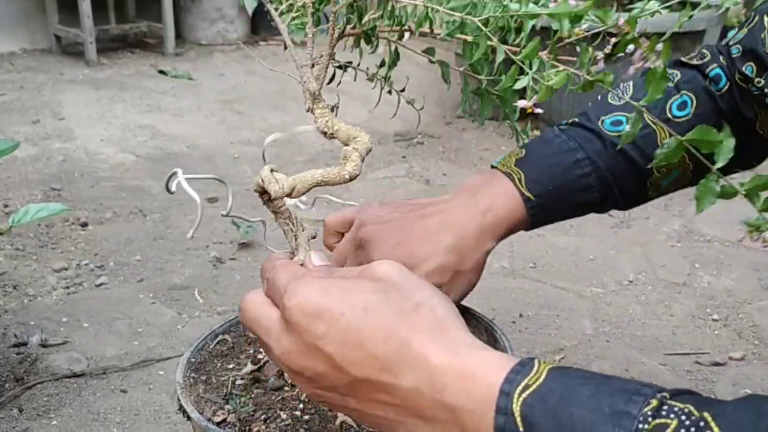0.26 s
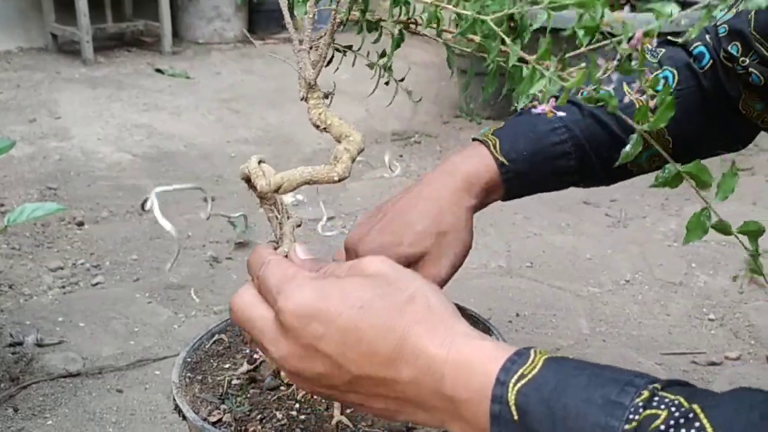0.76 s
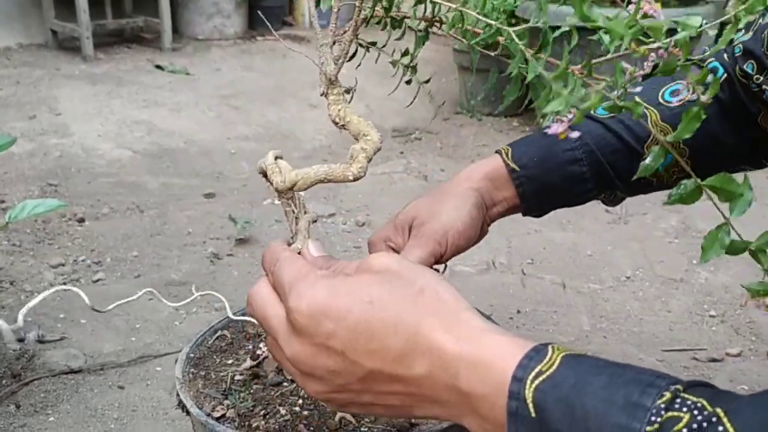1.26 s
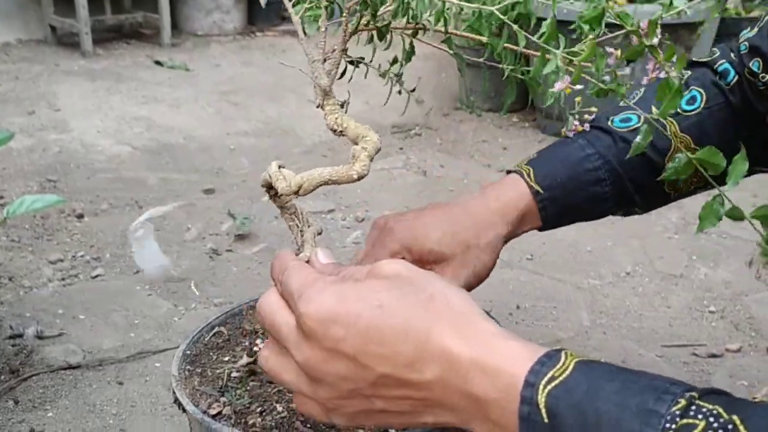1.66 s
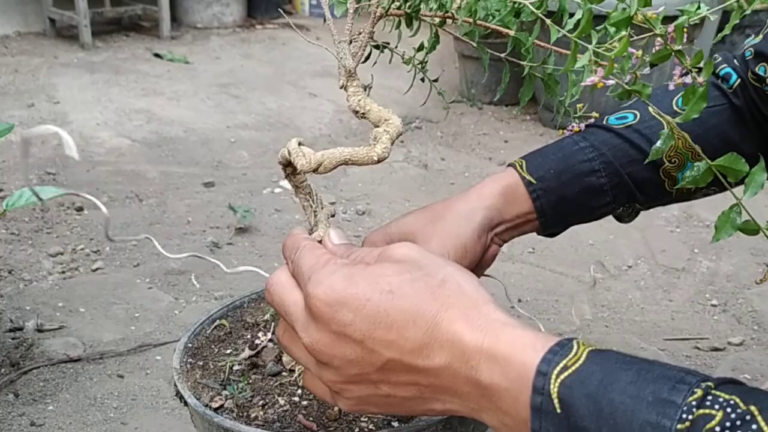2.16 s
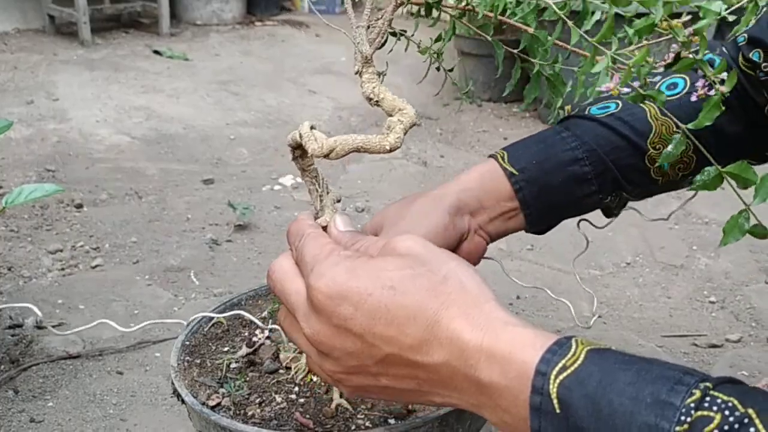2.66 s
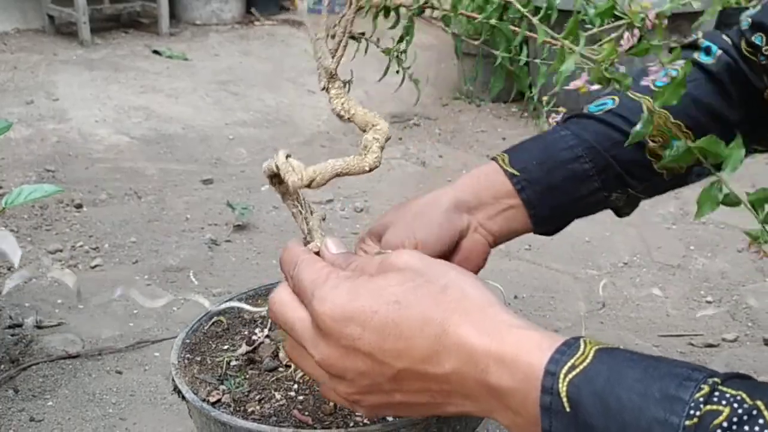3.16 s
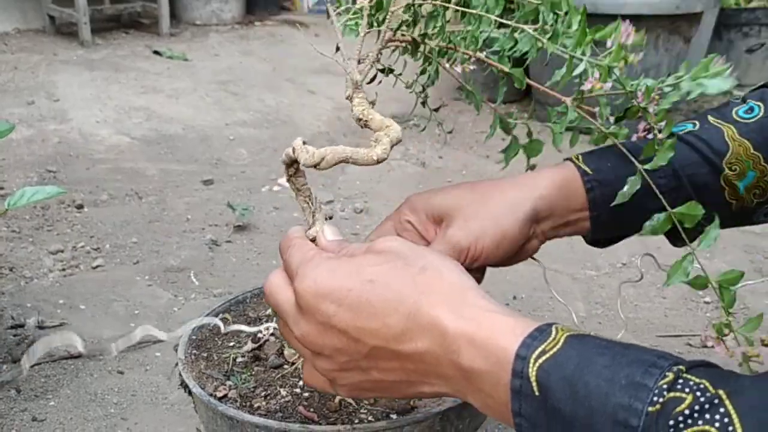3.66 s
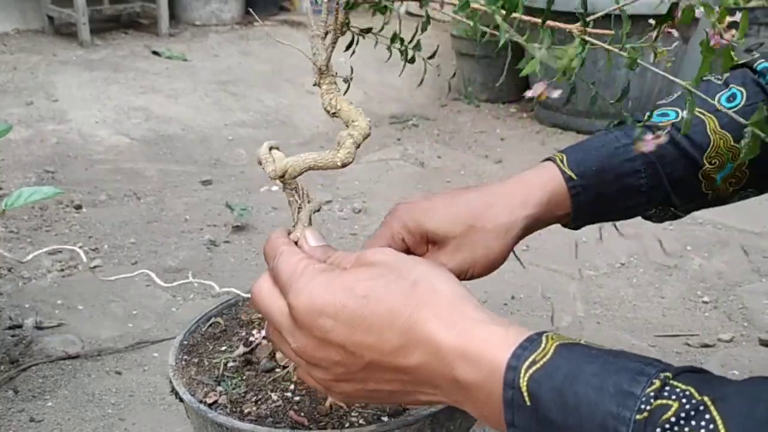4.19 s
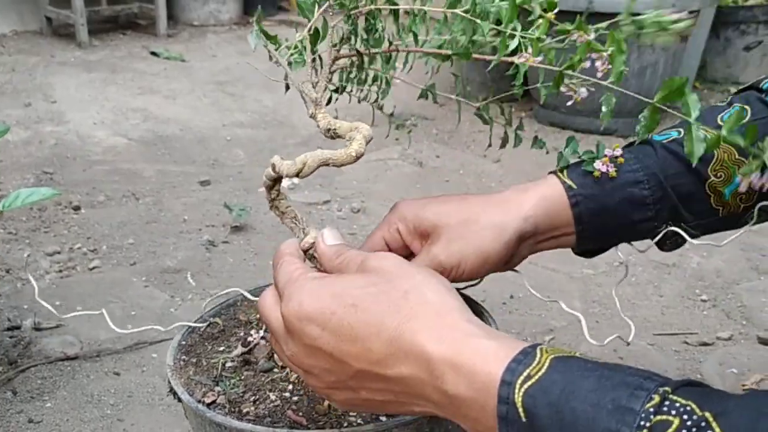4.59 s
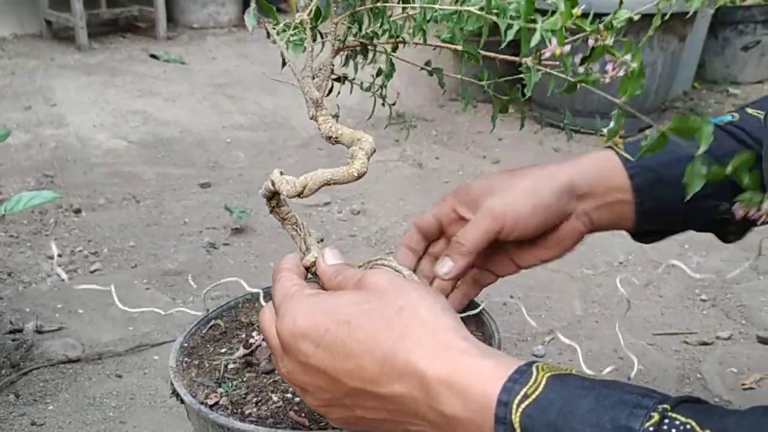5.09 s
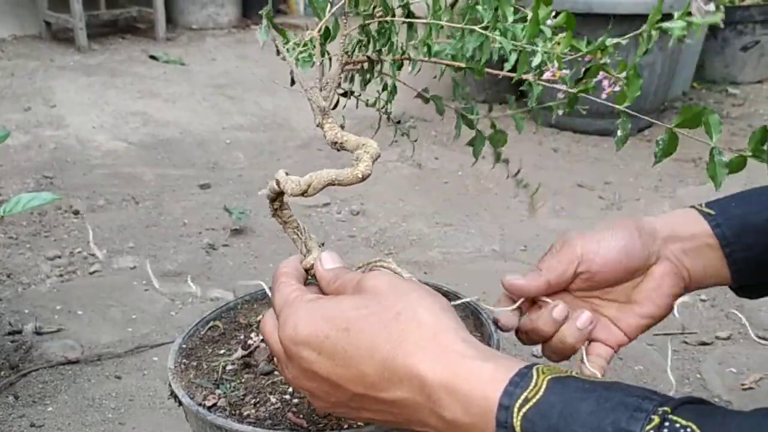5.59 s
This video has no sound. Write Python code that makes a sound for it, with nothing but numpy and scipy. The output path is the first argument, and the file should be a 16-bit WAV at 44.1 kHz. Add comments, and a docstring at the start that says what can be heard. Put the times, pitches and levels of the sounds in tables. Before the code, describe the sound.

Outdoors in a walled yard, a low distant engine hum and soft rumble run throughout, with a very faint leafy hiss. At 0.3 s a far bird gives one thin high note. At 1.05 s a nearer songbird, on the right, utters a shrill, husky-edged call lasting about 0.2 s that leaps up and warbles. At 1.6 and 1.9 s it whistles two swelling upward slurs, then from 2.3 to 3.9 s alternates breathy falling notes with clearer, louder high ones, about six a second, ending on two falling notes. Short diffuse echoes follow each note. Tiny dry ticks of wire on bark appear at 2.1 and 3.2 s, with a little leaf rustle around 3.3 s. After the song, ticks cluster at 4.1-4.3 s, with others at 4.7 and 5.2-5.5 s. The engine swells, strongest near 5.5 s, as leaves rustle and wire scrapes faintly, grainily at 5.3-5.6 s.

```python
"""A walled yard, with a songbird off to one side of the microphone. It gives one shrill two-voiced call,
then whistles a phrase: two rising slurs and a run of alternating falling and high notes. Its notes are
gliding sines with overtones and breath, echoed by the yard. Far off, another bird gives one thin note.
Hands wind wire round a potted shrub: filtered noise makes the ticks, a scrape and the leaf rustle.
In the distance an engine hums, a sum of slow-wavering sines, over a low noise rumble."""
import sys
import numpy as np
from scipy import signal
from scipy.fft import rfft, irfft, next_fast_len
from scipy.io import wavfile
from scipy.ndimage import uniform_filter1d, map_coordinates

SR = 44100
rng = np.random.default_rng(int(sys.argv[2]) if len(sys.argv) > 2 else 0)


def transcribe(u):
    """Save the signal u as a 16-bit wav file named by the first command-line argument.

    u: samples, shape (n,) or (channels, n), limited to [-1, 1]; the rate is SR.
    q: integer samples, one column per channel.
    """
    v = np.clip(np.atleast_2d(u).T, -1, 1)
    q = np.round(v * 32767).astype(np.int16)
    wavfile.write(sys.argv[1], SR, q)


N = 257544
TOP_HZ = 15850  # band limit of the microphone

SHRILL_AT_S, UNDER_AT_S = 1.053, 1.063  # starts of the call's upper and lower voices
# Note levels are those at the bird, before foliage and yard.
# Rising slurs that open the phrase: (t/s, length/s, from f/Hz, to f/Hz, peak level/dB)
RISING_NOTES = [(1.597, .19, 1402, 1920, -23), (1.915, 0.1426, 1958, 2083, -17.5)]
# Falling notes, f before the steady sag and level before the fade:
# (t/s, length/s, from f/Hz, to f/Hz, middle of the drop after t/s, glide t/s, level/dB)
FALLING_NOTES = [(2.298, 0.16, 2181, 1565, .06, .019, -21.5), (2.672, 0.09, 1888, 1450, 0.047, .01, -21.5),
                 (2.975, .095, 1810, 1320, 0.051, 0.0091, -22.5),
                 (3.288, 0.097, 1910, 1446, 0.052, 0.011, -20.5), (3.606, 0.11, 1812, 1256, .055, .01, -23),
                 (3.776, 0.16, 1734, 1342, 0.041, 0.008, -23.5)]
# High notes between them, f before the sag: (t/s, length/s, f/Hz, scooped from below by f/Hz, peak level/dB)
HIGH_NOTES = [(2.527, .113, 2333, 300, -17), (2.815, 0.12, 2294, 20, -16), (3.115, .105, 2286, 72, -16.5),
              (3.436, 0.12, 2347, 8.1, -18.5)]


def bird():
    """Both sides of the syrinx sound in the shrill call; one alone whistles the phrase."""
    voice = np.zeros(N)
    add(voice, SHRILL_AT_S, shrill_upper())
    add(voice, UNDER_AT_S, shrill_lower())
    for table, sing in (RISING_NOTES, rising_note), (FALLING_NOTES, falling_note), (HIGH_NOTES, high_note):
        for s, *shape in table:
            add(voice, s, sing(*shape))
    return voice


SHRILL_LENGTH_S = 0.219
SHRILL_LOW_HZ, SHRILL_HIGH_HZ = 4577, 5028
SHRILL_LOW_DB, SHRILL_HIGH_DB = -19, -12
LEAP_AFTER_S, LEAP_GLIDE_S, CLIMB_HZ_PER_S = 0.043, 0.0083, 1350
WARBLE_HZ, WARBLE_DEPTH_HZ = 16.5, 60


def shrill_upper(sag_db_per_s=6, warble_db=0.9):
    """The loud side of the call: husky and low, then a leap to a climbing whistle warbling in pitch and strength."""
    t = clock(SHRILL_LENGTH_S)
    leap = step(t, LEAP_AFTER_S, LEAP_GLIDE_S)
    warble = np.cos(2 * np.pi * WARBLE_HZ * t)
    high_hz = SHRILL_HIGH_HZ + CLIMB_HZ_PER_S * t + WARBLE_DEPTH_HZ * warble
    high_db = SHRILL_HIGH_DB + warble_db * warble - sag_db_per_s * t
    hz = SHRILL_LOW_HZ + leap * (high_hz - SHRILL_LOW_HZ) - droop(t, depth_hz=480, last=0.0064)
    db = SHRILL_LOW_DB + leap * (high_db - SHRILL_LOW_DB) + gate(t, attack=0.014, release=0.02)
    return note(hz, db, jitter=0.0057, overtone_db=-19.5, rasp=0.3, air_db=-39.5, husky_db=26.5)


UNDER_LENGTH_S, UNDER_GLIDE_S, UNDER_DB = 0.048, 0.018, -26.5
UNDER_FROM_HZ, UNDER_TO_HZ = 3820, 4460


def shrill_lower():
    """The second voice joins briefly under the first: a short rough upward glide."""
    t = clock(UNDER_LENGTH_S)
    hz = UNDER_TO_HZ + (UNDER_FROM_HZ - UNDER_TO_HZ) * np.exp(-t / UNDER_GLIDE_S)
    db = UNDER_DB + gate(t, attack=0.004, release=0.018)
    return note(hz, db, jitter=0.008, overtone_db=12.5, rasp=0.3, air_db=-24.0, husky_db=1)


RISE_BEND = 1.3  # above 1 the pitch levels off
RISE_PEAK_SHARE, RISE_SWELL_DB, RISE_FADE_DB = 0.815, 26, 6  # the note is loudest late


def rising_note(length, from_hz, to_hz, db):
    """A slur that swells as it climbs and levels off."""
    t = clock(length)
    hz = to_hz + (from_hz - to_hz) * (1 - t / length) ** RISE_BEND
    swell = np.interp(t / length, [0, RISE_PEAK_SHARE, 1], [-RISE_SWELL_DB, 0, -RISE_FADE_DB])
    level_db = db + swell + gate(t, attack=0.022, release=0.016)
    return note(hz, level_db, jitter=0.0089, overtone_db=2.5, rasp=0.12, air_db=-23.5, husky_db=3.5)


def falling_note(length, from_hz, to_hz, middle, glide, db, sag_db_per_s=40, sag_hz_per_s=850):
    """A note that slides down between two pitches, sagging all the while and growing huskier and weaker."""
    t = clock(length)
    hz = from_hz + (to_hz - from_hz) * step(t, middle, glide) - sag_hz_per_s * t
    level_db = db - sag_db_per_s * t + gate(t, attack=0.023, release=0.019)
    return note(hz, level_db, jitter=0.008, overtone_db=-6.0, rasp=0.056, air_db=-19.0, husky_db=6)


SCOOP_S = 0.022  # how quickly a scooped note reaches its pitch
HIGH_SAG_HZ_PER_S = 650
HIGH_PEAK_SHARE, HIGH_SWELL_DB, HIGH_FADE_DB = 0.46, 4, 10.5


def high_note(length, pitch_hz, scoop_hz, db):
    """A clear whistle that scoops up to its pitch, sags slowly and droops at the end."""
    t = clock(length)
    scooped_hz = pitch_hz - scoop_hz * np.exp(-t / SCOOP_S)
    hz = scooped_hz - HIGH_SAG_HZ_PER_S * t - droop(t, depth_hz=150, last=0.011)
    swell = np.interp(t / length, [0, HIGH_PEAK_SHARE, 1], [-HIGH_SWELL_DB, 0, -HIGH_FADE_DB])
    level_db = db + swell + gate(t, attack=0.019, release=0.0038)
    return note(hz, level_db, jitter=0.0048, overtone_db=-2, rasp=0.033, air_db=-19.5, husky_db=2.2)


# Overtones as shaped by throat and beak, before each note's own offset: (f/Hz, level/dB)
OVERTONE_SHAPE = [(2400, -21.5), (3000, -22), (3700, -34.5), (4500, -31), (5300, -34.5), (6600, -35),
                  (8200, -40.5), (9800, -25.5), (11300, -26.5), (12400, -42), (14000, -53.5),
                  (15500, -43.5)]
# The voice is husky at the low end of each of its two registers: (pitch f/Hz, roughness/0-1)
HUSKINESS = [(1200, 0.97), (1700, 0.82), (2100, 0.15), (2400, 0.37), (4000, 0.3), (4600, 1), (5100, 0.06)]
# Colour of the air rushing through the syrinx: (f/Hz, relative level/dB per Hz)
BREATH_COLOUR = [(1800, -18.5), (2500, -1.5), (4000, -8), (5400, 8), (8000, -3.5), (10400, 9.5),
                 (12000, -39), (14500, -9.5), (16000, -30)]


def note(hz, db, jitter, overtone_db, rasp, air_db, husky_db):
    """One slur of the syrinx: a gliding sine with overtones, roughened by the air that drives it."""
    size = len(hz)
    pitch = hz * (1 + jitter * wobble(163.1, size))
    husk = along(HUSKINESS, pitch)
    phase = 2 * np.pi * np.cumsum(pitch) / SR + rasp * husk * wobble(1300, size)
    level = amp(db + 2.73 * wobble(100.8, size))
    tone = np.sin(phase)
    for k in range(2, 10):
        # husky notes have stronger, less steady overtones
        gain_db = along(OVERTONE_SHAPE, k * pitch) + overtone_db + husky_db * husk
        gain = amp(gain_db) * (k * pitch < TOP_HZ)
        tone += gain * np.sin(k * phase + 0.5 * husk * wobble(700, size))
    grid = np.fft.rfftfreq(size, 1 / SR)
    air = irfft(rfft(rng.standard_normal(size)) * amp(along(BREATH_COLOUR, grid)), size)
    return level * (np.sqrt(2) * tone + amp(air_db) * husk ** 2 * unit(air))


# The clearest wire and twig ticks, levels before a common lift:
# (t/s, peak level/dB, centre f/Hz, left-right level/dB)
CLEAR_TICKS = [(2.1151, -38, 4000, -21), (3.235, -29.5, 6900, -2.5), (4.1478, -44, 3400, -22),
               (4.2271, -44.5, 3000, -19), (4.25, -39.5, 3460, -28), (4.2822, -39.5, 2960, -30),
               (4.3177, -33, 7930, 4), (4.682, -39, 3970, -24.5), (5.1856, -40.5, 4400, -7),
               (5.2086, -42, 2980, -32), (5.2882, -40, 2670, -21), (5.4954, -33, 2830, -11)]
TICK_LIFT_DB = 4.5


def ticks(t60=0.022, octaves=0.84, dull_hz=10500):
    """Wire slips on bark: short dry snaps of decaying noise, each around its own pitch."""
    out = np.zeros((2, N))
    t = np.arange(2048) / SR
    grid = np.fft.rfftfreq(len(t), 1 / SR)
    for s, db, hz, lean_db in CLEAR_TICKS + faint_ticks():
        band = np.exp(-0.5 * (np.log2((grid + 1) / hz) / octaves) ** 2)
        colour = band / (1 + (grid / dull_hz) ** 10)
        # noise common to both sides, plus some of each side's own
        noise = rng.standard_normal(len(t)) + 0.5 * rng.standard_normal((2, len(t)))
        snap = irfft(rfft(noise) * colour) * amp(-60 * t / t60)
        add(out, s, amp(db + TICK_LIFT_DB) * sides(lean_db)[:, None] * snap / np.abs(snap).max())
    return out


WINDING_FROM_S, WINDING_TO_S = 2.5, 5.6
FAINT_TICK_DB, FAINT_TICK_HZ, FAINT_LEAN_DB = -43, 4120, 1  # level before the lift


def faint_ticks(count=6, spread_db=4, spread_octaves=0.515):
    """Fainter ticks come at random while the wire is wound tight; rows as in the table of clear ticks."""
    rows = []
    for when, strength, height in rng.random((count, 3)):
        s = WINDING_FROM_S + when * (WINDING_TO_S - WINDING_FROM_S)
        db = FAINT_TICK_DB + spread_db * (2 * strength - 1)
        hz = FAINT_TICK_HZ * 2 ** (spread_octaves * (2 * height - 1))
        rows.append((s, db, hz, FAINT_LEAN_DB))
    return rows


# Strokes of wire drawn over the pot's rim: (t/s, half width t/s, peak level/dB)
WIRE_STROKES = [(5.29, .015, -48.5), (5.42, 0.034, -49), (5.57, 0.05, -54)]
# Colour of the scrape: (f/Hz, relative level/dB per Hz)
SCRAPE_COLOUR = [(600, -9), (1400, 5), (2200, 4), (3200, -6), (6000, -3), (10000, -34), (15000, -44)]


def wire(slip_rate=350):
    """The loose wire catches and slips as it is drawn out: random impulses make a short grainy scrape."""
    strength = rng.uniform(-0.91, 1, N) + 0.48 * rng.uniform(-1, 1, (2, N))
    slips = (rng.random(N) < slip_rate / SR) * strength
    grains = unit(filtered(slips, lambda hz: amp(along(SCRAPE_COLOUR, hz))))
    return swells(WIRE_STROKES) * grains * sides(-28.5)[:, None]


# Leaves and sleeves stirred by the hands, before flutter and crackle:
# (t/s, half width t/s, peak level/dB)
STIR_STROKES = [(3.24, .035, -51), (3.33, 0.11, -53), (5.3, 0.57, -53), (5.44, 0.1, -52.5)]
# Colour of the leaves: (f/Hz, relative level/dB per Hz)
LEAF_COLOUR = [(350, -22.5), (700, -5), (1300, -5), (2600, -4.5), (3600, -7.5), (8600, -9), (10200, -19.5),
               (13000, -23.5), (16000, -34)]
RUSTLE_DB = -56.5  # steady rustle under the strokes


def shrub(crackle_rate=14, crackle_db=13):
    """The soft rustle of the shrub: patchy noise that flutters in level, flecked with tiny crackles."""
    specks = (rng.random(N) < crackle_rate / SR) * rng.standard_normal((2, N))
    crackle = amp(crackle_db) * filtered(specks, lambda hz: amp(along(LEAF_COLOUR, hz)))
    stir = np.hypot(amp(RUSTLE_DB), swells(STIR_STROKES)) * amp(0.58 * wobble(45))
    return stir * (rush(LEAF_COLOUR, patchy_db=1.67) + 2 * crackle)


FAR_AT_S, FAR_LENGTH_S = 0.33, 0.195
FAR_HZ, FAR_SCOOP_HZ, FAR_DB = 3850, 71, -57.5  # level before the mix with its echo


def far_bird(sag_db_per_s=50):
    """The distant bird's one note: a thin whistle that scoops up to its pitch and weakens."""
    voice, t = np.zeros(N), clock(FAR_LENGTH_S)
    hz = FAR_HZ - FAR_SCOOP_HZ * np.exp(-t / SCOOP_S)
    db = FAR_DB - sag_db_per_s * t + gate(t, attack=0.0019, release=0.02)
    add(voice, FAR_AT_S, note(hz, db, jitter=0.011, overtone_db=-24, rasp=0.3, air_db=-26.5, husky_db=2.5))
    return voice


# The engine slows a little as it comes nearer: (t/s, mean cycle rate f/Hz, level/dB)
ENGINE_COURSE = [(0, 28.93, -54.5), (3.9, 28.42, -56), (4.4, 28.53, -50.5), (5.5, 28.05, -44.5),
                 (5.84, 27.67, -48.5)]
# Engine orders: (multiple of the cycle rate, relative level/dB)
ENGINE_ORDERS = [(2, -4), (3, -15.5), (4, -5), (6, -2), (8, -1.5), (10, -17.5), (12, -16.5)]
# A second hum: (f/Hz, level/dB before its fade)
SECOND_HUM = [(86.1, -61), (177.6, -58), (209.9, -57), (290.7, -64.5)]
# Fade of that second hum: (t/s, level/dB)
SECOND_HUM_FADE = [(0, -2), (.7, -4), (1.3, -5.5), (3, -6.5)]


def engine():
    """Low orders of a distant engine, each wavering on its way, and a second hum that fades a little."""
    rate, db = curves(ENGINE_COURSE)
    phase = 2 * np.pi * np.cumsum(rate * (1 + 0.0017 * wobble(4.2))) / SR
    hum = np.zeros(N)
    for k, level in ENGINE_ORDERS:
        hum += amp(level + 3.7 * wobble(4.5)) * np.sin(k * phase + 0.28 * wobble(1.7))
    t = np.arange(N) / SR
    drone = np.zeros(N)
    for hz, level in SECOND_HUM:
        drone += amp(level + 4.1 * wobble(11.0)) * np.sin(2 * np.pi * hz * t + wobble(4.5))
    return amp(db) * unit(hum) + amp(curves(SECOND_HUM_FADE)[0]) * drone


# Colour of the neighbourhood's rumble: (f/Hz, relative level/dB per Hz)
RUMBLE_COLOUR = [(12, -46), (24, 7), (40, -7), (70, -6.5), (130, -9), (165, -1.5), (205, -9.5), (260, -11),
                 (370, -15), (540, -12.5), (720, -24), (1200, -28), (2600, -120)]
RUMBLE_DB, RUMBLE_FOLLOWS = -52, 0.2  # mean level; share of the engine's swell in dB that it takes


def neighbourhood():
    """Low noise rumble that partly follows the engine's swell."""
    engine_db = curves(ENGINE_COURSE)[1]
    level_db = RUMBLE_DB + RUMBLE_FOLLOWS * (engine_db - engine_db.mean())
    return amp(level_db) * rush(RUMBLE_COLOUR, patchy_db=1.78)


# Decay of the yard's tail: (f/Hz, t60/s)
YARD_DECAY = [(500, 0.25), (1600, 0.48), (2300, 0.53), (5000, 0.36), (12000, 0.23)]
# Strength of the yard's echo: (f/Hz, level/dB)
ECHO_LEVEL = [(1200, -8.5), (1700, 2.5), (2050, 0), (2280, -1), (2650, 6.5), (3500, -1.5), (4400, -7.5),
              (5200, -11), (7000, 6.5), (12000, -3)]


def yard(x, gap=0.0031, early_db=5, early_t60=0.19):
    """Near walls and pots answer densely at once; then a tail, each frequency dying at its own speed."""
    noise = rng.standard_normal((2, SR * 3 // 4))
    hz, t, z = signal.stft(noise, SR, nperseg=256)
    late = amp(-60 * t / along(YARD_DECAY, hz)[:, None])
    early = amp(early_db - 60 * t / early_t60)
    shape = (late + early) * np.minimum(t / gap / 2, 1)
    energy = np.sum(shape ** 2, axis=1, keepdims=True) * t[1] * SR
    shape *= amp(along(ECHO_LEVEL, hz))[:, None] / np.sqrt(energy)
    tail = signal.istft(z * shape, SR, nperseg=256)[1]
    return signal.fftconvolve(x[None], tail, axes=1)[:, :N]


# Likeness of the two sides in background noise: (f/Hz, left-right correlation)
SIDE_LIKENESS = [(60, 0.85), (150, 0.91), (380, 0.84), (950, 0.35), (2380, -0.0), (5980, 0.0033),
                 (15000, -0.0)]


def rush(spectrum, patchy_db):
    """Stereo noise of rms 1 with patches of random gain in time and frequency."""
    z = signal.stft(rng.standard_normal((2, N)), nperseg=512)[2]
    field = rng.standard_normal(z.shape[1:])
    field = uniform_filter1d(uniform_filter1d(field, 16, 0), 8, 1)
    pair = signal.istft(z * amp(patchy_db * unit(field)), nperseg=512)[1][:, :N]

    def mid_side(hz):
        turn = np.arccos(np.clip(along(SIDE_LIKENESS, hz), -1, 1)) / 2
        return amp(along(spectrum, hz)) * [np.cos(turn), np.sin(turn)]

    mid, side = filtered(pair, mid_side)
    return unit(np.array([mid + side, mid - side]))


def clock(length):
    """Time since the start of a note."""
    return np.arange(round(length * SR)) / SR


def step(t, middle, glide):
    """A smooth passage from 0 to 1 around the middle."""
    return 0.5 + 0.5 * np.tanh((t - middle) / (2 * glide))


def gate(t, attack, release):
    """Level in dB of a note that opens, holds and closes."""
    return 20 * np.log10(np.clip(np.minimum(t / attack, (t[-1] - t) / release), 1e-4, 1))


def droop(t, depth_hz, last):
    """The pitch lost in a note's last moments, as the pressure gives out."""
    return depth_hz * np.exp((t - t[-1]) / last)


def swells(rows):
    """Gain of overlapping bell-shaped strokes, added in power."""
    t = np.arange(N) / SR
    return np.sqrt(sum((amp(db) * np.exp(-0.5 * ((t - s) / width) ** 2)) ** 2 for s, width, db in rows))


def amp(db):
    """Decibels to gain."""
    return 10 ** (np.asarray(db) / 20)


def unit(x):
    """Scale to rms 1."""
    return x / np.sqrt(np.mean(x ** 2) + 1e-20)


def along(points, hz):
    """Interpolate (f/Hz, value) points on a log frequency axis."""
    f, v = np.transpose(points)
    return np.interp(np.log(hz + 1), np.log(f + 1), v)


def curves(rows):
    """One value per sample for each column after the time."""
    s, *cols = np.transpose(rows)
    return [np.interp(np.arange(N) / SR, s, c) for c in cols]


def wobble(rate, size=N):
    """A smooth random curve, rate knots a second."""
    knots = rng.standard_normal(int(size * rate / SR) + 4)
    return map_coordinates(knots, [np.arange(size) * rate / SR])


def filtered(x, response):
    """x times a response of frequency."""
    m = next_fast_len(N + SR // 2)
    return irfft(rfft(x, m) * response(np.fft.rfftfreq(m, 1 / SR)), m)[..., :N]


def sides(lean_db):
    """Left and right gains of mean power 1."""
    pair = amp(np.array([lean_db, -lean_db]) / 2)
    return pair / np.sqrt(np.mean(pair ** 2, axis=0))


def add(track, s, x):
    """Mix x into the track at time s."""
    part = track[..., round(s * SR):][..., :x.shape[-1]]
    part += x[..., :part.shape[-1]]


# The bird's straight path through the foliage: (f/Hz, level/dB)
FOLIAGE = [(1200, -9), (1600, 0.5), (2000, -5), (2300, -3.5), (5200, -2), (7500, -5), (11000, -3)]
# The bird's balance at the microphone: (f/Hz, left-right level/dB)
BIRD_LEAN = [(1250, -5.5), (1700, 2), (2000, -6.5), (2280, -12.5), (2800, -21.5), (4400, -24.5),
             (5200, -17), (7000, 0.5), (11000, 0.5), (15000, -6.5)]


def scene(lag=0.000369):
    """The bird sits off to one side; the left microphone port hears its direct sound a little later."""
    song, distant, snaps = bird(), far_bird(), ticks()

    def straight_path(hz):
        delay = np.exp(1j * np.pi * hz * lag * np.array([[-1], [1]]))
        return amp(along(FOLIAGE, hz)) * delay

    direct = filtered(song, straight_path)
    near = filtered(direct + yard(song), lambda hz: sides(along(BIRD_LEAN, hz)))
    echoes = yard(amp(5) * distant + amp(-5) * snaps.mean(axis=0))
    small = amp(0.5) * distant + snaps + echoes
    background = (engine() + neighbourhood() + shrub()) * sides(0.34)[:, None]
    return near + small + wire() + background


def record(dry):
    """The microphone keeps nothing above its band limit."""
    return filtered(dry, lambda hz: hz < TOP_HZ)


dry = scene()
out = record(dry)
transcribe(out)
```